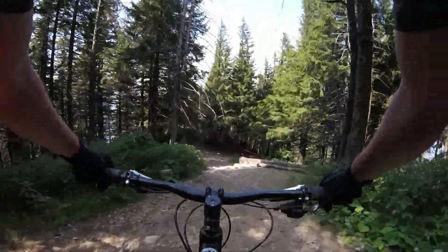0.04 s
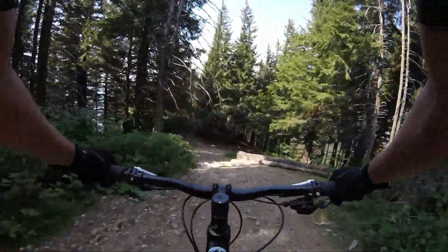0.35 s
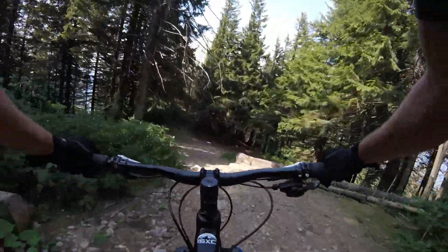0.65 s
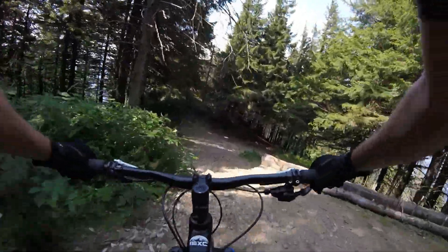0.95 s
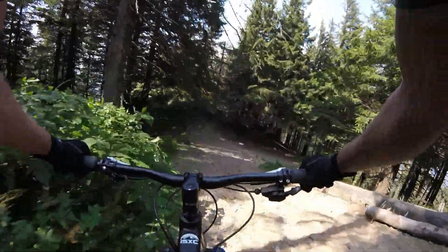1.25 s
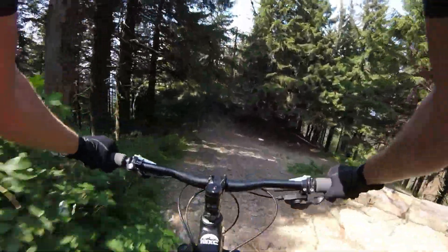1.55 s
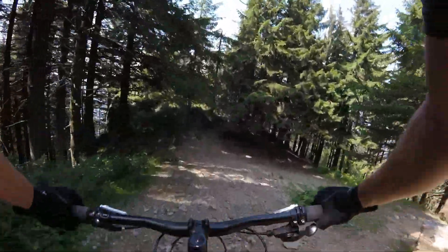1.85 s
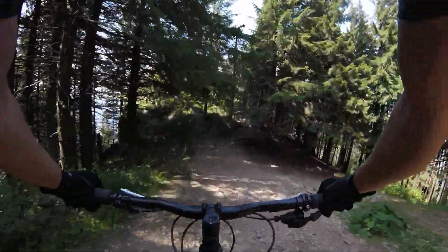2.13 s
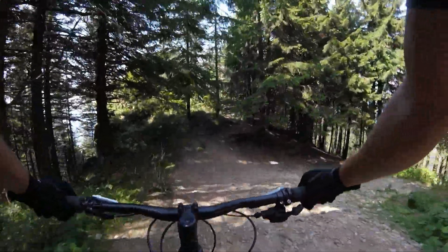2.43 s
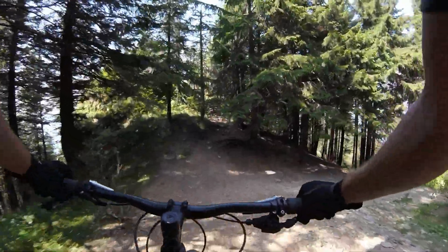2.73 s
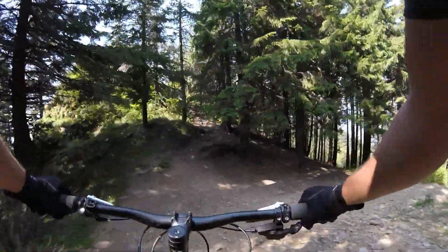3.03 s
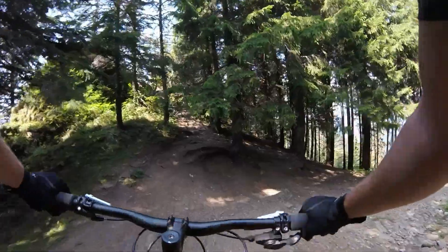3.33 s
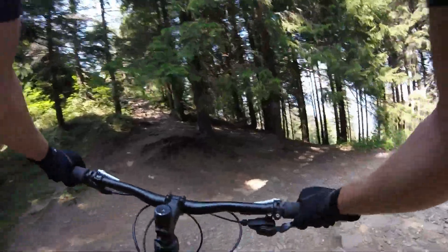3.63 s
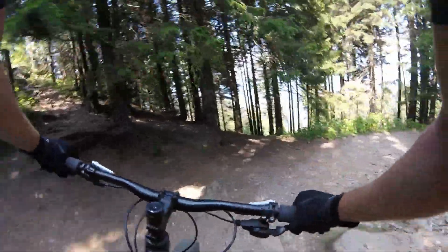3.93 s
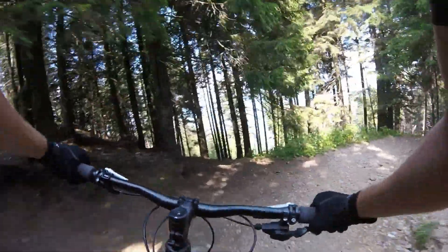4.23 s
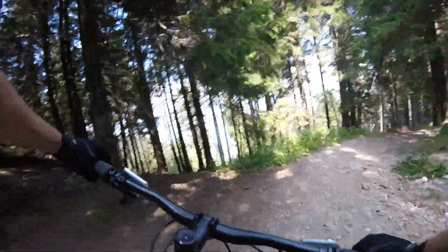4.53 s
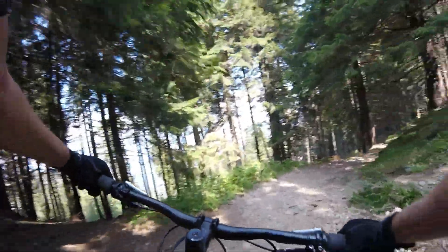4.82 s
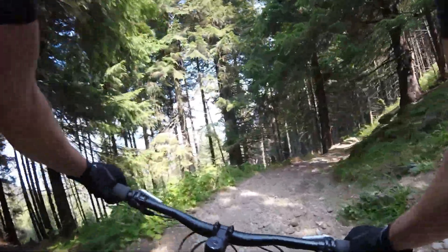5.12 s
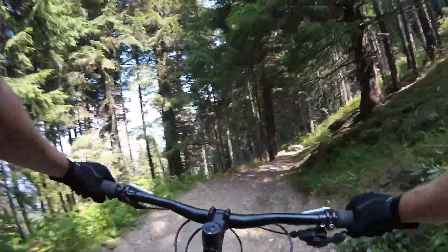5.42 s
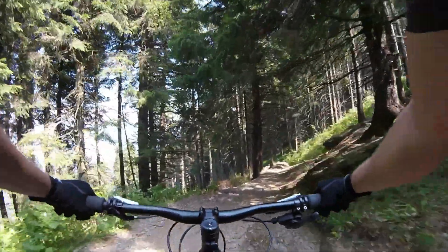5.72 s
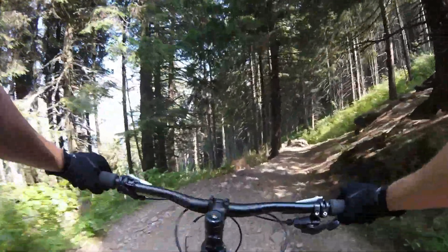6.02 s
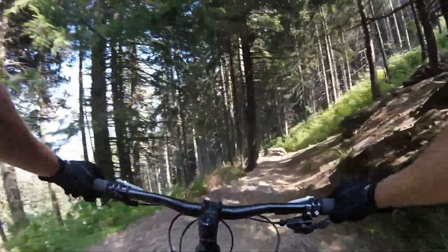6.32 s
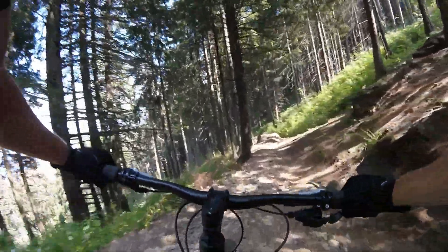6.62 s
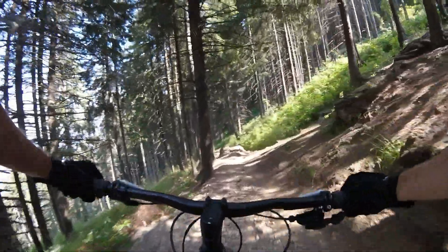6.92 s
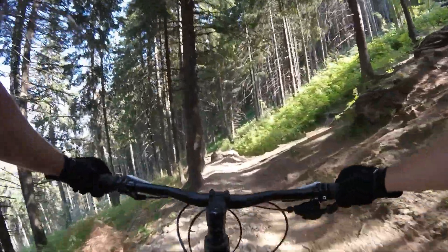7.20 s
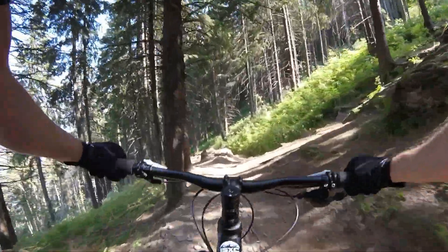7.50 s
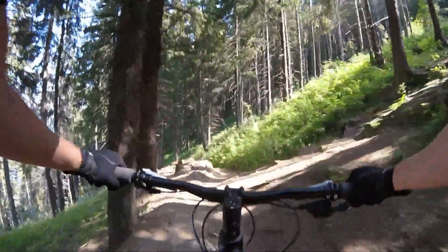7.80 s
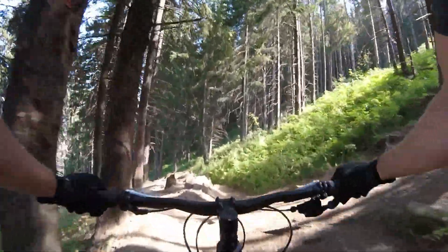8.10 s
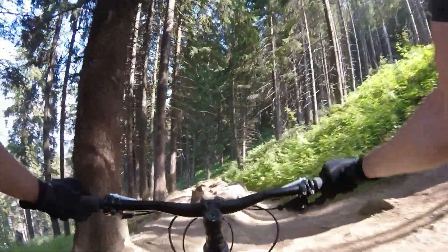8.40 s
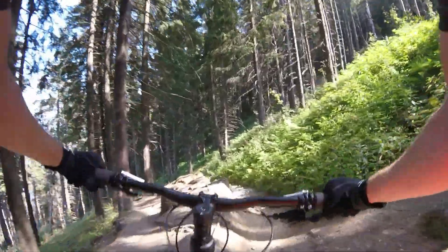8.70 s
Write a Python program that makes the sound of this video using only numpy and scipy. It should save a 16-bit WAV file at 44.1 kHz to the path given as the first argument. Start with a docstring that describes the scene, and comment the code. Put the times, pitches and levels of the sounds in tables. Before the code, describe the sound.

A mountain bike rides down a stony forest trail, heard close from the rider's chest. Wind buffets the microphone while the tyres drum and crunch over grit. Stones knock through the frame, cables tick on metal and a tyre skids briefly. Halfway, the wind drops and the chain slaps in a quick flurry. Lighter wind returns, and knocks, ticks and rattles crowd together near the end.

```python
"""A mountain bike rolls down a stony forest trail, heard from a camera on the rider's chest.
From the start wind buffets the microphone while the tyres drum and crunch grit. Cables tick on
metal, stones knock through the frame, the chain slaps and rattles, and a tyre skids briefly.
Halfway, the wind drops as the bike slows into a banked turn, and the chain whips in a quick flurry.
A lighter wind returns, and knocks, ticks and rattles crowd together near the end."""
import sys
import numpy as np
from scipy import signal
from scipy.fft import rfft, irfft, next_fast_len
from scipy.io import wavfile
from scipy.ndimage import uniform_filter1d, map_coordinates

SR = 44100
rng = np.random.default_rng(int(sys.argv[2]) if len(sys.argv) > 2 else 0)


def put_to_file(sound):
    """Save the sound as 16-bit audio at rate SR, in the file named by the first command-line argument."""
    columns = np.atleast_2d(sound).T  # one column per channel
    safe = np.clip(columns, -1, 1)
    whole_steps = np.round(safe * 32767)
    wavfile.write(sys.argv[1], SR, whole_steps.astype(np.int16))


N = 394674
PING_HZ = 5160  # the ring of a small steel part

# The ground under the wheels. Each row: time in seconds, relative drumming and grit levels in dB.
GROUND = [(0.0, -30, -51), (0.7, -28, -48), (1.83, -28, -47), (3.18, -32, -52), (3.57, -30.5, -48.5),
          (4.8, -32.5, -51.5), (5.33, -29.5, -49.5), (5.6, -29.5, -49), (6.7, -30, -48.5),
          (7.62, -28.5, -50), (7.92, -27, -49.5), (8.16, -30.5, -51), (8.94, -34, -49)]
# The larger stones and roots. Each row: start in seconds, peak of the blow in dB, pitch in Hz.
STONE_HITS = [(0.76, -10, 775), (1.062, -3, 590), (1.259, -11, 744), (1.269, -14, 700), (1.347, -19, 740),
              (1.4071, -10, 760), (1.411, -9, 656), (1.696, -11, 620), (1.767, -14.5, 700),
              (1.826, -16.5, 900), (1.994, -14.5, 700), (2.005, -8.5, 890), (2.086, -12, 675),
              (2.983, -17.5, 940), (3.074, -19.5, 950), (3.254, -13, 960), (3.27, -11, 680),
              (4.034, -13.5, 895), (4.091, -15, 814), (4.564, -18, 750), (4.936, -16, 810),
              (5.179, -4.5, 790), (5.189, -11.5, 480), (5.342, -20, 720), (5.512, -19, 880),
              (5.828, -12, 584), (6.059, -13, 865), (6.075, -11.5, 755), (6.715, -17, 780),
              (6.729, -16, 930), (6.7347, -10.5, 940), (7.056, -20, 700), (7.098, -15.5, 616),
              (7.341, -16, 586), (7.47, -18, 610), (7.734, -19, 945), (7.813, -11.5, 646),
              (7.945, -23, 700), (8.1358, -12, 855), (8.231, -14.5, 870), (8.283, -19, 900),
              (8.3616, -18.5, 900), (8.486, -20, 600), (8.493, -11, 790)]
# The tone of crunching grit. Each row: frequency in Hz, gain in dB.
GRIT_TONE = [(700, -12), (1500, 8), (2000, -4), (2570, 6.5), (3020, -3.5), (3520, 2.5), (4350, -4.5),
             (5200, 0.5), (6300, -5.5), (7400, -12), (8200, -9), (9000, -14), (9700, -12), (12500, -19),
             (15000, -30)]
# The tone of a dull blow. Each row: frequency in Hz, gain in dB.
THUD_TONE = [(60, -27), (200, 2.5), (500, -6.5), (1020, -2), (1400, -8.5), (2000, -36.5), (5000, -34.5),
             (12000, -82)]


def amp(db):
    """Decibels to gain."""
    return 10 ** (np.asarray(db) / 20)


def unit(x):
    """Scale to rms 1."""
    return x / np.sqrt(np.mean(x ** 2) + 1e-20)


def unit_peak(x):
    """Scale to peak 1."""
    return x / (np.abs(x).max() + 1e-20)


def colour(points, hz):
    """An EQ curve: the gain of (Hz, dB) points joined on a log axis."""
    point_hz, db = np.transpose(points)
    return amp(np.interp(np.log(hz + 1), np.log(point_hz + 1), db))


def curves(rows):
    """Automation lanes: one value per sample for each column after the time."""
    times, *columns = np.transpose(rows)
    return [np.interp(np.arange(N) / SR, times, column) for column in columns]


def wobble(rate):
    """A smooth random curve, rate knots a second."""
    knots = rng.standard_normal(int(N * rate / SR) + 4)
    return map_coordinates(knots, [np.arange(N) * rate / SR])


def filtered(x, response):
    """Pass x through a response given as a function of frequency."""
    size = 2 * next_fast_len(len(x))
    return irfft(rfft(x, size) * response(np.fft.rfftfreq(size, 1 / SR)), size)[:len(x)]


def causal(gain):
    """The minimum-phase response with this gain: nothing sounds before the blow."""
    cepstrum = irfft(np.log(gain + 1e-6))
    half = len(cepstrum) // 2
    return np.exp(rfft(np.r_[cepstrum[0], 2 * cepstrum[1:half], np.zeros(half)]))


def resonance(hz, centre, width):
    """The response of one damped mode."""
    return 1j * hz * width / (centre ** 2 - hz ** 2 + 1j * hz * width)


def add(track, start, sound):
    """Mix a sound into a track, start seconds in."""
    part = track[max(0, round(start * SR)):][:len(sound)]
    part += sound[:len(part)]


def burst(sound, start, length):
    """A stretch of a sound, timed in seconds, that swells and fades; rms 1."""
    part = sound[round(start * SR):][:round(length * SR)]
    return unit(part * signal.windows.tukey(len(part)))


def wind(flutter_growth=1.47):
    """Eddies on the microphone: a deep rumble, and a flutter that grows faster in strong flow."""
    # The flow of air. Each row: time in seconds, relative level in dB.
    airflow = [(0.0, -14), (0.3, -14), (0.52, -14.5), (0.87, -17.5), (0.99, -13), (1.1, -19.5), (1.42, -18),
               (1.62, -16), (1.79, -14.5), (1.95, -24.5), (2.15, -17), (2.55, -17.5), (2.73, -12.5),
               (2.84, -17), (3.26, -15), (3.55, -18.5), (3.65, -16), (3.8, -24.5), (3.96, -20.5),
               (4.11, -21.5), (4.2, -25), (4.5, -32.5), (5.05, -33), (5.44, -20.5), (5.62, -30.5),
               (6.08, -23), (6.25, -29), (6.7, -27), (7.55, -26), (7.7, -25), (8.1, -20.5), (8.3, -25),
               (8.94, -25.5)]
    # The tones of the large and the small eddies. Each row: frequency in Hz, gain in dB.
    rumble_tone = [(8, -5.5), (20, 2.5), (50, -1), (80, -9), (130, -18.5), (220, -30.5), (700, -64),
                   (6000, -100)]
    flutter_tone = [(20, -4), (45, -1.5), (120, -3.5), (200, -11), (350, -21), (700, -28), (6000, -78.5)]
    flow_db, = curves(airflow)
    flutter_db = -18 + flutter_growth * (flow_db + 15.5)
    track = np.zeros(N)
    for tone, level_db in ((rumble_tone, flow_db + 1), (flutter_tone, flutter_db)):
        eddies = unit(filtered(rng.standard_normal(N), lambda hz: colour(tone, hz)))
        # the flow sets the strength over a tenth of a second; quicker lumps come by chance
        strength = np.sqrt(np.abs(uniform_filter1d(eddies ** 2, size=SR // 10)) + 1e-6)
        track += amp(level_db) * eddies / strength
    return track * unit(amp(1.73 * wobble(28)))


def impacts(rate, spread_db):
    """Randomly timed impulses of uneven size, about rate a second; rms 1."""
    hit = rng.random(N) < rate / SR
    size = amp(spread_db * np.clip(rng.standard_normal(N), -2, 2))
    return unit(hit * size * rng.choice([-1, 1], N))


def jolts(rate, t60, spread_db):
    """The force of stones passing under the tyres: sudden rises that die away; rms 1."""
    fade = amp(-60 * np.arange(SR // 4) / SR / t60)
    return unit(signal.fftconvolve(np.abs(impacts(rate, spread_db)), fade)[:N])


def grains(rate, cycles, spread_db, low_hz, high_hz):
    """Tiny stones snapping together, each at its own pitch for a cycle or so; rms 1."""
    when, pitch, size = rng.random((int(rate * N / SR), 3)).T[:, :, None]
    age = np.arange(SR // 100)
    turns = low_hz * (high_hz / low_hz) ** pitch * age / SR
    strength = amp(-spread_db * np.log(size + 0.016))  # many small snaps, few large ones
    snaps = strength * np.sin(2 * np.pi * turns) * turns * np.exp(-turns / cycles)
    positions = (when * N).astype(int) + age
    return unit(np.bincount(positions.ravel(), snaps.ravel(), N)[:N])


def frame(hz):
    """The ring of frame and wheels."""
    # Each row: pitch of a mode in Hz, width in Hz, gain in dB.
    modes = [(168.8, 2.3, 11.5), (216.6, 16.3, 7), (322, 25, -2), (489, 31.5, 2.5), (619, 19, -1),
             (880, 510, -7.5)]
    return sum(amp(db) * resonance(hz, centre, width) for centre, width, db in modes)


def tyres(steady_load=0.88):
    """Knobs and small stones drum through the frame while grit crunches; each jolt lifts both."""
    drum_db, grit_db = curves(GROUND)
    load = unit(steady_load + jolts(rate=62, t60=0.041, spread_db=3.0))
    tread = unit(load * rng.standard_normal(N) + 0.25 * impacts(rate=110, spread_db=-0.5))
    # The tone of the drumming. Each row: frequency in Hz, gain in dB.
    drum_tone = [(60, -28), (150, -11), (250, 1.5), (400, 3), (700, 0), (1020, -4.5), (1200, -11),
                 (1400, -19), (1650, -18.5), (1950, -25.5), (3000, -32.5), (8000, -61)]
    drum = unit(filtered(tread, lambda hz: causal(colour(drum_tone, hz)) * (1 + frame(hz))))
    fine_grit = (load + 0.9) * rng.standard_normal(N)
    cracks = grains(rate=300, cycles=0.5, spread_db=4.5, low_hz=1690, high_hz=7000)
    crunch = unit(filtered(fine_grit + 0.6 * cracks, lambda hz: colour(GRIT_TONE, hz)))
    return amp(drum_db - 0.55) * drum + amp(grit_db - 0.36) * crunch


def tyre_hum(pitch_hz=218, offset_db=-11, waver_db=3.5):
    """The air inside the rolling tyres booms at one narrow pitch, louder on rough ground."""
    drum_db, _ = curves(GROUND)
    boom = unit(filtered(rng.standard_normal(N), lambda hz: resonance(hz, pitch_hz, width=22) ** 2))
    return amp(drum_db + offset_db + waver_db * wobble(8)) * boom


def thud(hz):
    """The bike's dull response to a blow."""
    return causal(colour(THUD_TONE, hz))


def pebbles(offset_db=-14.5, pitch_hz=920, width_hz=480, patchy_db=4.5):
    """Small stones lie in patches and give light, hollow taps under the tread."""
    drum_db, _ = curves(GROUND)
    stones = impacts(rate=90, spread_db=1.5) * amp(patchy_db * np.clip(wobble(11), -2, 1.5))
    taps = filtered(stones, lambda hz: resonance(hz, pitch_hz, width_hz) * thud(hz))
    return amp(drum_db + offset_db) * unit(taps)


def steel(hz):
    """The steely ring of the metal parts."""
    # Each row: frequency in Hz, gain in dB.
    steel_tone = [(1500, -43), (2700, -35.5), (3450, 4), (4200, -5.5), (4800, 2.5), (5170, 1), (5700, -3),
                  (6400, -8), (7500, -19.5), (12000, -56)]
    return causal(colour(steel_tone, hz))


def grit_spray(offset_db=-14, ring=1.9, width_hz=300):
    """Grit flung up by the tyres patters on the metal parts and sets them ringing faintly."""
    _, grit_db = curves(GROUND)
    taps = jolts(rate=41, t60=0.022, spread_db=4.0) * rng.standard_normal(N)
    patter = filtered(taps, lambda hz: steel(hz) * (1 + ring * resonance(hz, PING_HZ, width_hz)))
    return amp(grit_db + offset_db) * unit(patter)


def bright(hz):
    """The highest resonances of the metal parts."""
    # Each row: frequency in Hz, gain in dB.
    bright_tone = [(4000, -18), (6500, 2), (8220, 6.5), (8900, -1), (9650, 0), (11000, -9), (12500, -2),
                   (15000, -9)]
    return causal(colour(bright_tone, hz))


def hollow(pitch_hz, relative_width=0.44, reach=1.9):
    """The response of a struck frame tube: one broad resonance, with little left far above it."""
    def response(hz):
        ratio = hz / (reach * pitch_hz)
        lowpass = 1 / (1 - ratio ** 2 + 1j * np.sqrt(2) * ratio)
        return resonance(hz, pitch_hz, relative_width * pitch_hz) ** 2 * lowpass
    return response


def clack(response, contact_s, chatter=0.32, bite=0, chatter_t60=0.082):
    """A rough contact swells and dies, then chatters; bite is a hard click at its height. Peak 1."""
    t = np.arange(SR // 25) / SR
    pressure = np.sqrt(t / contact_s) * np.exp(-t / contact_s) + chatter * amp(-60 * t / chatter_t60)
    force = pressure * rng.standard_normal(len(t))
    force[pressure.argmax()] = bite
    return unit_peak(filtered(force, response))


def ping(rise_s=0.00073, t60=0.012, detune=0.0086):
    """One short, clean ring of a small steel part, never at quite the same pitch; peak 1."""
    t = np.arange(SR // 25) / SR
    pitch_hz = PING_HZ * (1 + detune * rng.standard_normal())
    envelope = (1 - np.exp(-(t / rise_s) ** 2)) * amp(-60 * t / t60)
    return unit_peak(envelope * np.sin(2 * np.pi * pitch_hz * t))


def ticks(body_db=-8, body_hz=2300):
    """Cables and flung pebbles tick on metal over a faint hollow body; some are bright, some ping."""
    # Each row: start in seconds, steely peak in dB, then bright part and ping in dB against that peak.
    contacts = [(0.418, -39.5, -1, 4), (1.769, -35, -11, -8), (2.495, -34, -14, -2), (2.761, -33, -13, -3),
                (3.459, -31, -9.5, -8), (3.504, -32, -16, -21), (4.053, -35, -20, -10),
                (4.678, -36, -20, -14), (4.892, -32.5, 0, 0), (5.12, -36.5, -0.5, -5),
                (5.199, -34, -9, -15), (5.544, -24.5, -28, -15), (5.827, -31, -25, 0),
                (5.902, -35.5, -20, -3), (6.063, -20.5, -11, -6), (6.13, -32.5, -24, -5),
                (6.717, -34.5, -22, -10), (7.201, -29.5, -25, -6), (7.336, -35.5, -22, -15),
                (7.435, -35, -16, -15), (7.481, -32.5, -18, -4), (7.592, -36, -18, -11),
                (7.699, -38, -3, -2), (7.745, -33.5, -15, -4), (7.771, -36, -9, -3), (7.811, -29, -24, -12),
                (7.837, -35, -4.5, -12), (7.884, -26.5, -23, -16), (7.893, -35, -25, -10),
                (7.971, -35.5, -9, -10), (8.0182, -27.5, -8, 4), (8.067, -37, -19, -8)]
    body = hollow(body_hz, relative_width=0.29)
    track = np.zeros(N)
    for start, db, bright_db, ping_db in contacts:
        for response, part_db in ((steel, 0), (bright, bright_db), (body, body_db)):
            add(track, start, amp(db + part_db) * clack(response, contact_s=0.00041, chatter=0.2))
        add(track, start, amp(db + ping_db) * ping())
    return track


def knocks(chatter=0.078, chatter_t60=0.051, rise_s=0.0023, direct=0.4, ring=0.19, usual_width_hz=300):
    """A stone gives the tyre one dull blow and loose parts shudder after; low blows ring longer."""
    track = np.zeros(N)
    t = np.arange(SR // 6) / SR
    shudder = chatter * amp(-60 * t / chatter_t60) * (1 - np.exp(-t / rise_s))
    usual_hz = np.median([pitch_hz for _, _, pitch_hz in STONE_HITS])
    for start, db, pitch_hz in STONE_HITS:
        width_hz = usual_width_hz * pitch_hz / usual_hz
        soft = lambda hz: causal(colour(THUD_TONE, hz) / np.hypot(1, (hz / (1.3 * pitch_hz)) ** 2))
        body = lambda hz: soft(hz) * (direct + resonance(hz, pitch_hz, width_hz) + ring * frame(hz))
        blow = filtered(signal.unit_impulse(len(t)), body)
        shake = filtered(shudder * rng.standard_normal(len(t)), body)
        add(track, start, amp(db) * (blow + shake) / np.abs(blow).max())
    return track


def loose_parts(pitch_hz=1600, usual_knock_db=-12, follow=0.98):
    """Every knock jars the loose parts into a hollow, steely clack, louder the harder it is."""
    track = np.zeros(N)
    for start, db, _ in STONE_HITS:
        lift_db = follow * (db - usual_knock_db)
        for response, part_db in ((hollow(pitch_hz), -35.5), (steel, -42)):
            add(track, start, amp(part_db + lift_db) * clack(response, contact_s=0.0038))
    return track


def chain_slaps():
    """The chain whips against the frame: each slap a hard click, hollow and steely, over a dull thud."""
    # Each row: start in seconds, hollow peak in dB, hollow pitch in Hz,
    # steely part in dB against that peak, contact time in seconds.
    slaps = [(1.317, -26, 3400, -15, 0.0035), (1.3324, -21, 3550, -17, 0.002),
             (1.335, -16, 2350, -20, 0.00196), (4.382, -16.5, 1800, -5.5, 0.0014),
             (4.407, -14.5, 1640, -6, 0.0011), (4.423, -25, 1800, -6, 0.0011),
             (4.432, -14.5, 1600, -5, 0.0015), (4.442, -21.5, 1700, -6.5, 0.002),
             (4.449, -28, 1900, 0, 0.0011), (4.469, -25.5, 1770, -2, 0.0018),
             (5.973, -23.5, 1550, -18, 0.002), (6.059, -21, 1500, -3, 0.0055),
             (6.42, -24, 1490, -13, 0.0013)]
    track = np.zeros(N)
    for start, db, pitch_hz, steel_db, contact_s in slaps:
        tube = hollow(pitch_hz, relative_width=0.46)
        for response, part_db in ((tube, 0), (steel, steel_db), (bright, steel_db - 11.5), (thud, 2.5)):
            add(track, start, amp(db + part_db) * clack(response, contact_s, chatter=0.09, bite=4.5))
    return track


def chain_rattles(shake_db=14, cutoff_hz=7000):
    """Chain links chatter in quick irregular taps that swell and fade, and the frame shakes with them."""
    # Each row: start in seconds, length in seconds, level of the chatter in dB.
    rough_stretches = [(1.647, 0.22, -49.5), (2.486, 0.082, -55), (6.027, 0.08, -44.5),
                       (6.226, 0.04, -45.5), (7.424, 0.083, -45), (7.796, 0.11, -45.5), (7.99, 0.057, -48)]
    track = np.zeros(N)
    taps = jolts(rate=115, t60=0.023, spread_db=4.5) * rng.standard_normal(N)
    links = lambda hz: causal(colour(GRIT_TONE, hz) / np.hypot(1, (hz / cutoff_hz) ** 2))
    chatter = filtered(taps, links)
    shake = filtered(taps, lambda hz: frame(hz) * thud(hz))
    for start, length, db in rough_stretches:
        add(track, start, amp(db) * burst(chatter, start, length))
        add(track, start, amp(db + shake_db) * burst(shake, start, length))
    return track


def skid(start_s=1.665, length_s=0.15, level_db=-45):
    """The tyre slides briefly sideways and grinds coarse grit, swelling and fading."""
    coarse_grit = grains(rate=700, cycles=1, spread_db=6.0, low_hz=2240, high_hz=4150)
    grinding = filtered(coarse_grit, lambda hz: colour(GRIT_TONE, hz))
    track = np.zeros(N)
    add(track, start_s, amp(level_db) * burst(grinding, start_s, length_s))
    return track


def scene():
    """The rolling bed, the bumps and the wind meet at one microphone."""
    rolling = tyres() + tyre_hum() + pebbles() + grit_spray() + skid()
    bumps = knocks() + loose_parts() + chain_slaps() + ticks() + chain_rattles()
    return (wind() + rolling + bumps)[None]


def record(dry):
    """The camera rounds off the highest peaks and cuts the top treble; the ends fade over a few ms."""
    ceiling, top_hz = 0.95, 15000
    rounded = dry / (1 + np.abs(dry / ceiling) ** 6) ** (1 / 6)
    faded = rounded * signal.windows.tukey(N, 0.001)
    return np.array([filtered(channel, lambda hz: hz < top_hz) for channel in faded])


dry = scene()
out = record(dry)
put_to_file(out)
```